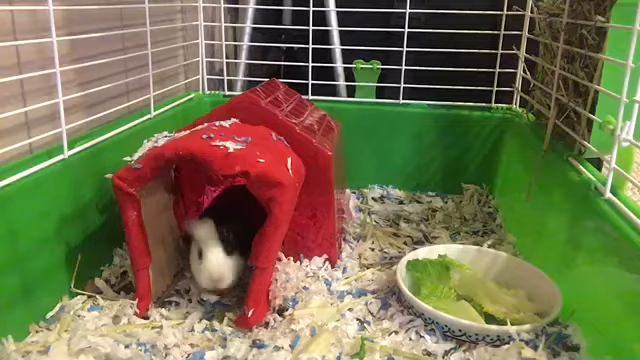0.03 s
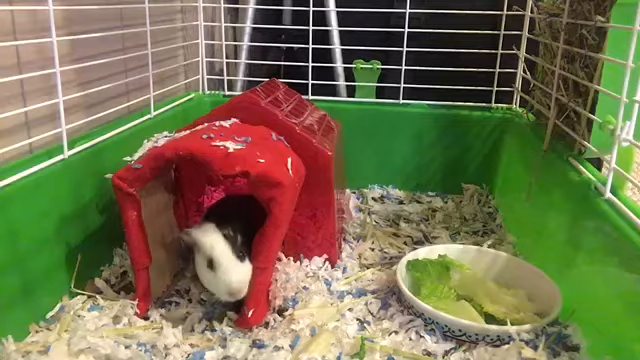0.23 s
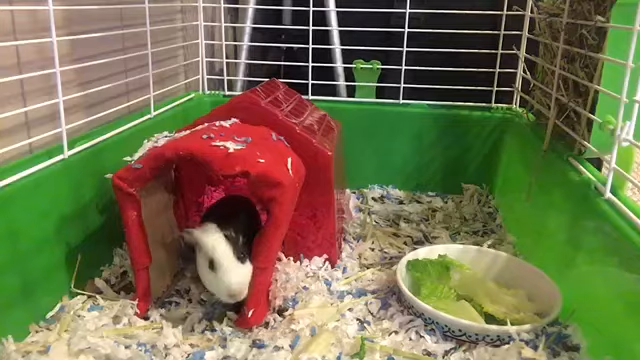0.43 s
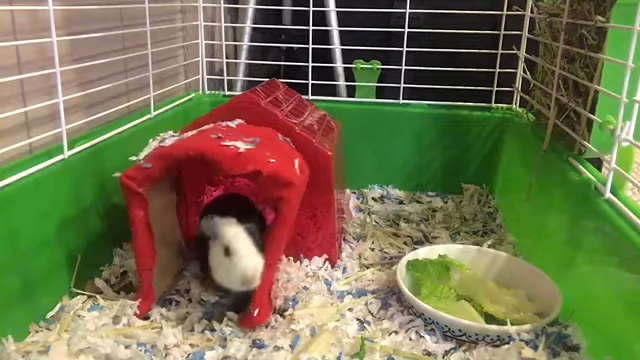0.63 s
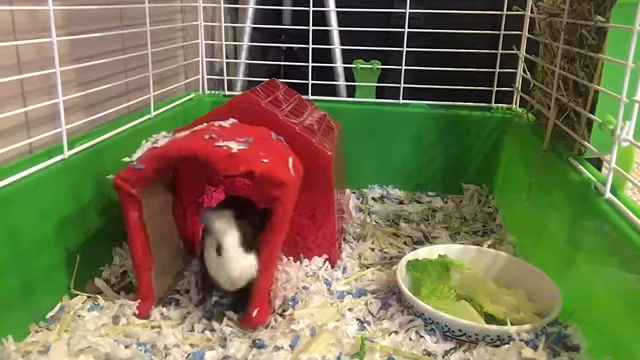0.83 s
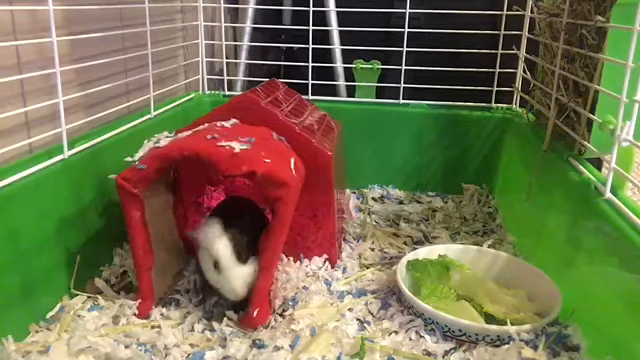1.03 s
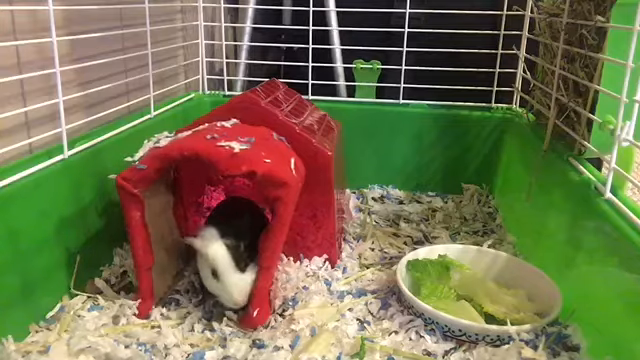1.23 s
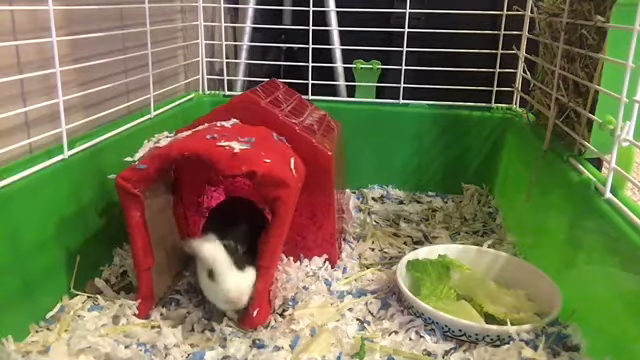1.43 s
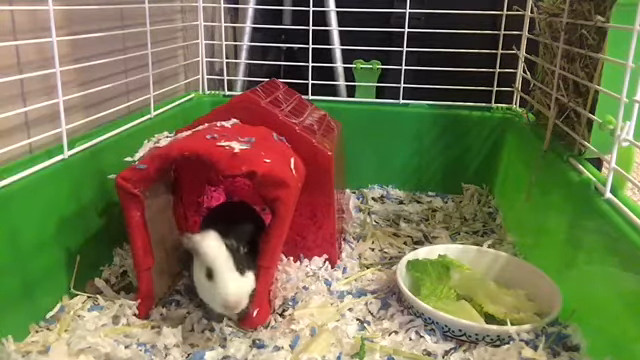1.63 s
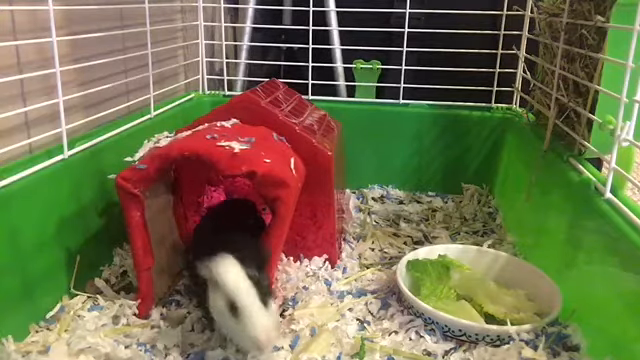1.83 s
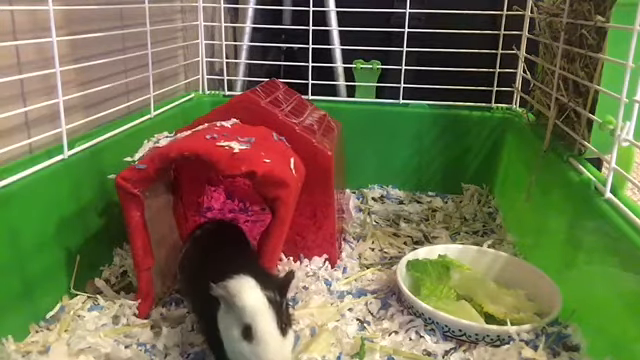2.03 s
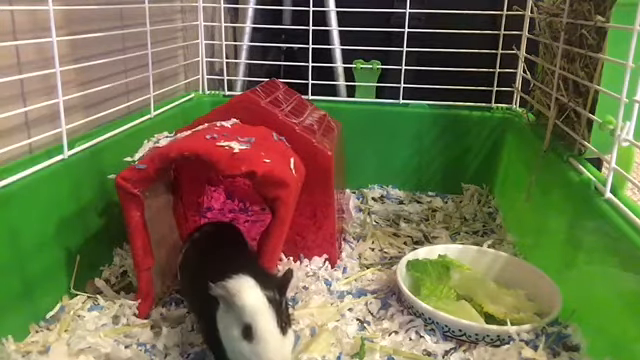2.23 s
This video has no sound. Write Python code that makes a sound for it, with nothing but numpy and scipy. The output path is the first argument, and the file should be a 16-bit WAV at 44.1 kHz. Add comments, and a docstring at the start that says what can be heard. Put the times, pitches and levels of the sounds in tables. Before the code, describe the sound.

Guinea pig's padded footsteps thump and knock on a plastic cage tray through shredded paper

```python
"""The padded steps of a guinea pig leaving its shelter over shredded paper boom and knock a plastic cage tray.
Each step rings damped modes of the tray and crushes paper; shifting weight adds a rumble of shaped noise.
Tapped shelter modes, crackling paper rustles and snaps, and a thin rough squeak lie among the steps.
Behind them are the camera's buzz, fizz and tick from a switched load, and room rumble and microphone hiss
from filtered noise."""
import sys
import numpy as np
from scipy import signal
from scipy.fft import rfft, irfft, next_fast_len
from scipy.io import wavfile
from scipy.ndimage import uniform_filter1d

SR = 44100
rng = np.random.default_rng(int(sys.argv[2]) if len(sys.argv) > 2 else 0)


def log_audio(samples):
    """Write samples as a 16-bit WAV file to the path given in sys.argv[1]."""
    # one column per channel
    frames = np.atleast_2d(samples).T
    # limit to full scale, then quantise
    limited = np.clip(frames, -1, 1)
    pcm = np.round(limited * 32767).astype(np.int16)
    wavfile.write(sys.argv[1], SR, pcm)


N = 100768  # length in samples
EVENT_T = np.arange(SR // 4) / SR  # time within one quarter-second event, in seconds

# Modes of the whole tray: pitch_hz, level_db, t60_s
THUD_MODES = [(56, -8, .16), (74, 0, .22), (88, -5, .16)]
# Modes of the tray floor: pitch_hz, level_db, t60_s
BOOM_MODES = [(122, -5, .18), (141, 1, .22), (174, -9, .15), (205, -11, .12)]
# Modes of the tray walls: pitch_hz, level_db, t60_s
KNOCK_MODES = [(258, 0, .13), (355, -3, .1), (432, 0, .11), (492, -2, .1), (590, -1, .11), (790, -3, .09),
               (1010, -8, .08), (1180, -9, .07)]
# Paw contacts: start_s, thud_level_db, boom_level_db, knock_level_db, favoured_wall_pitch_hz
STEPS = [(0.069, -62, -45.5, -51.5, 290), (.103, -73, -45, -53.5, 493), (0.121, -42.5, -59, -53, 262),
         (.155, -46, -54, -51, 260), (.205, -46.5, -55, -53, 328), (0.249, -43, -51.5, -53, 444),
         (0.271, -45.5, -59, -70, 490), (.385, -57, -45.5, -49, 191), (.571, -45, -50, -54, 318),
         (.596, -36, -55.5, -92, 298), (0.675, -33, -55, -54.5, 527), (.717, -49, -45.5, -56, 332),
         (.759, -69, -45, -41.5, 420), (.783, -31, -41, -40.5, 241), (.808, -63, -47, -57, 540),
         (0.841, -54, -46, -46.5, 313), (.945, -62, -51, -46.5, 306), (.99, -43, -43.5, -46.5, 324),
         (1.031, -54, -51, -48, 270), (1.12, -52, -39, -55.5, 427), (1.157, -79, -49, -50, 272),
         (1.426, -43, -56, -55.5, 630), (1.448, -45, -51, -64, 396), (1.528, -56, -49, -59.5, 448),
         (1.842, -38.5, -52, -82, 300), (1.912, -39, -59, -41.5, 217), (1.925, -37, -25, -50, 227),
         (1.95, -41, -37, -52, 330), (2.002, -59, -60, -47, 610), (2.009, -51, -36.5, -45.5, 250),
         (2.026, -58, -43, -48, 465), (2.062, -61, -46.5, -58, 342), (2.09, -49, -63, -74, 250),
         (2.138, -49, -48.5, -86, 248)]
STEP_ATTACK_S = .005
PADDING = 1.35  # bedding cutoff as a multiple of the favoured pitch
FOCUS_DB_PER_OCT = 15  # loss of a wall mode with distance from the favoured pitch
WALL_SAG = 0.082  # the walls start sharp by this fraction, then sag as the paw's weight settles
SCUFF_DB, SCUFF_T60_S, SCUFF_OCTAVES = -8.5, 0.067, 0.52  # crushed paper, relative to the wall ring


def steps():
    """Modal excitation: each paw rings the tray and crushes paper; the contact point weights the wall modes."""
    out = np.zeros(N)
    press = amp(SCUFF_DB - 60 * EVENT_T / SCUFF_T60_S) * (1 - np.exp(-EVENT_T / STEP_ATTACK_S))
    for start, thud_db, boom_db, knock_db, contact_hz in STEPS:
        walls = []
        for hz, db, t60 in KNOCK_MODES:
            distance_octaves = abs(np.log2(hz / contact_hz))
            walls.append((hz, db - FOCUS_DB_PER_OCT * distance_octaves, t60))
        scuff = press * crackle(band(contact_hz, SCUFF_OCTAVES))
        knock = ring(walls, STEP_ATTACK_S, WALL_SAG) + scuff
        # the bedding acts as a low-pass on the knock and scuff
        bedding = signal.butter(N=3, Wn=PADDING * contact_hz, fs=SR, output="sos")
        padded_knock = signal.sosfilt(bedding, knock)
        thud = ring(THUD_MODES, STEP_ATTACK_S)
        boom = ring(BOOM_MODES, STEP_ATTACK_S)
        add(out, start, amp(thud_db) * thud + amp(boom_db) * boom + amp(knock_db) * padded_knock)
    return out


# Level of the tray's rumble over time: time_s, level_db
SHIFTING_LEVEL = [(0, -58.5), (.07, -58), (.13, -46), (.27, -50), (.33, -58.5), (.53, -58), (.62, -49.5),
                  (.76, -35), (.9, -46), (1.02, -49), (1.17, -51), (1.24, -53.5), (1.38, -58.5),
                  (1.46, -52), (1.66, -58), (1.8, -49), (1.88, -47.5), (2.04, -42), (2.28, -70.5)]
# Spectrum of the tray's rumble: pitch_hz, level_db
RUMBLE_SPECTRUM = [(15, -9), (28, 6), (48, 0.5), (62, 4.5), (75, 9), (88, 1), (105, -4.5), (137, -1),
                   (175, -12), (220, -12), (256, -18.5), (315, -20.5), (470, -30.5), (700, -39.5),
                   (1500, -47.5), (4000, -66)]


def shifting():
    """Continuous random excitation: the animal's moving weight keeps the tray rumbling between steps."""
    return amp(curve(SHIFTING_LEVEL)) * noise(RUMBLE_SPECTRUM)


# Light taps on the shelter: start_s, low_mode_level_db, high_mode_level_db
TAPS = [(.017, -56.5, -73), (.205, -58, -81), (0.923, -54.5, -50.5), (.938, -58.5, -64), (1.747, -73, -57),
        (1.929, -77, -55.5)]
# Lower shelter mode: pitch_hz, level_db, t60_s
TAP_LOW_MODE = [(824, 0, 0.061)]
# Upper shelter mode: pitch_hz, level_db, t60_s
TAP_HIGH_MODE = [(1082, 0, 0.031)]


def taps():
    """Impulsive excitation of two damped modes: small hollow taps on the shelter."""
    out = np.zeros(N)
    for start, low_db, high_db in TAPS:
        low = amp(low_db) * ring(TAP_LOW_MODE, attack_s=.0012)
        high = amp(high_db) * ring(TAP_HIGH_MODE, attack_s=.0015)
        add(out, start, low + high)
    return out


# Paper rustles: start_s, length_s, level_db, centre_hz, half_width_octaves
RUSTLES = [(.138, 0.06, -69, 2500, 0.34), (0.142, 0.038, -73.5, 4800, 1), (0.193, 0.054, -73, 1400, 1),
           (0.558, 0.038, -74.5, 1430, 1), (0.656, 0.053, -74, 1510, 1), (0.738, 0.026, -66, 1720, 1),
           (0.753, 0.037, -64.5, 810, 0.27), (1.105, 0.014, -71, 950, 0.23),
           (1.415, .17, -69.5, 1080, 0.93), (1.457, 0.049, -79, 1980, 0.57),
           (1.998, 0.056, -68, 1000, 0.68), (2.226, 0.053, -70, 2020, 0.54)]
# Single paper strips snapping free: start_s, level_db, pitch_hz
SNAPS = [(0.145, -57, 2650), (0.154, -67, 2800), (.165, -58, 2670), (.178, -64, 2360), (0.23, -60, 1190),
         (0.58, -66, 1700), (.669, -60, 1750), (.746, -62, 2700), (1.292, -57, 1690), (1.418, -60, 2100),
         (1.477, -66, 1380), (1.488, -64, 2210), (1.531, -62, 960), (1.561, -64.5, 1900)]
RUSTLE_RISE = .4  # fraction of a rustle spent rising
SNAP_T60_S, SNAP_GRIT_DB, SNAP_OCTAVES = .02, -8, .5  # grit level is relative to the snap


def rustles():
    """Friction and sudden release: paper strips brush past each other in swells, and single strips snap free."""
    out = np.zeros(N)
    for start, length, db, hz, width in RUSTLES:
        swell = np.interp(EVENT_T / length, [0, RUSTLE_RISE, 1], [0, 1, 0]) ** .5
        add(out, start, amp(db) * swell * crackle(band(hz, width)))
    for start, db, hz in SNAPS:
        grit_decay = amp(SNAP_GRIT_DB - 60 * EVENT_T / SNAP_T60_S)
        grit = grit_decay * crackle(band(hz, SNAP_OCTAVES))
        tone = ring([(hz, 0, SNAP_T60_S)], attack_s=0.0013)
        add(out, start, amp(db) * (tone + grit))
    return out


SQUEAK_S, SQUEAK_LENGTH_S, SQUEAK_HZ, SQUEAK_DB = 1.205, .125, 2630, -79
SQUEAK_SAG, SQUEAK_SETTLE_S = .05, .025  # initial sharpness as a fraction, and its time constant


def squeak():
    """Frequency modulation: a thin tone, roughened by random pitch jitter, sags onto its pitch."""
    out = np.zeros(N)
    sag = SQUEAK_SAG * np.exp(-EVENT_T / SQUEAK_SETTLE_S)
    jitter = 0.2 * rng.standard_normal(len(EVENT_T))
    hz = SQUEAK_HZ * (1 + sag + jitter)
    swell = np.abs(np.sin(np.pi * np.clip(EVENT_T / SQUEAK_LENGTH_S, 0, 1))) ** .5
    tone = np.sin(2 * np.pi * np.cumsum(hz) / SR)
    add(out, SQUEAK_S, amp(SQUEAK_DB) * swell * tone)
    return out


# Spectrum of the switching clicks: pitch_hz, level_db
EDGE_SPECTRUM = [(150, -23), (500, 5.5), (900, 3), (1700, -4), (2500, -1), (3200, -11.5), (5000, -17),
                 (7000, -12.5), (15000, -14)]
# Partials of the tick: pitch_hz, level_db, t60_s
TICK_PARTIALS = [(1360, 0.5, 0.0021), (1950, -6, 0.0035), (4100, -6, 0.0031), (7160, -2.5, 0.003),
                 (11530, 1, 0.0025), (14500, -22, 0.0019)]
# Spectrum of the load's fizz: pitch_hz, level_db
FIZZ_SPECTRUM = [(9000, -60), (12500, -17), (13500, -6), (14350, 0), (15000, -4), (15700, -10)]
BUZZ_HZ, OFF_S, GAP_S = 60, .0109, .0047  # switching rate, a switch-off time, time spent off per cycle
TICK_HZ, TICK_S = 20, .0166  # a tick every third cycle, and the time of one tick
EDGE_DB, TICK_DB, FIZZ_DB = -77.5, -57, -75
FIZZ_OFF_DB = -6.5  # fizz with the load off relative to on, split evenly about FIZZ_DB


def electronics():
    """Periodic switching transients: a load clicks at both edges and fizzes more while on; an even tick recurs."""
    t = np.arange(N) / SR
    on = ((t - OFF_S) % (1 / BUZZ_HZ) > GAP_S) * 1.
    edges = unit(coloured(np.diff(on, prepend=on[0]), EDGE_SPECTRUM))
    age = (t - TICK_S) % (1 / TICK_HZ)
    ticks = np.zeros(N)
    for hz, db, t60 in TICK_PARTIALS:
        ticks += amp(db - 60 * age / t60) * np.sin(2 * np.pi * hz * age)
    fizz = amp(FIZZ_DB + FIZZ_OFF_DB * (0.5 - on)) * noise(FIZZ_SPECTRUM)
    return amp(EDGE_DB) * edges + amp(TICK_DB) * ticks + fizz


# Spectrum of the room rumble: pitch_hz, level_db
ROOM_SPECTRUM = [(20, -7.5), (60, -12.5), (140, -6), (200, -11.5), (320, -24), (600, -28), (1200, -33.5),
                 (2400, -34.5), (3000, -57), (6000, -101)]
# Spectrum of the microphone hiss: pitch_hz, level_db
HISS_SPECTRUM = [(300, 2.5), (2550, -3), (2900, -1.5), (3400, -0.5), (4050, 2.5), (4350, 1), (4700, 5),
                 (5000, 2), (5300, 3), (5900, -0.5), (6400, -6), (7100, 0.5), (8400, -0.5), (9700, 2.5),
                 (10400, -1.5), (11600, -1.5), (15500, -1.5)]
# Level of the hiss over time: time_s, level_db
HISS_LEVEL = [(0, -77), (.69, -77.5), (.74, -73), (1.6, -71.5), (1.77, -74.5), (1.88, -72.5), (2.28, -71.5)]
ROOM_DB = -61.5
PATCH_DB = 3.5  # rms depth of the flicker below 6 kHz


def background():
    """Stationary broadband noise: room rumble, and microphone hiss of slowly varying level."""
    room = amp(ROOM_DB) * patchy(noise(ROOM_SPECTRUM), PATCH_DB)
    hiss = amp(curve(HISS_LEVEL)) * patchy(noise(HISS_SPECTRUM), PATCH_DB)
    return room + hiss


SAG_S = .016  # time constant of a mode's pitch sag


def ring(modes, attack_s, sag=0):
    """Modal synthesis: damped modes after a soft blow, each slightly reweighted and detuned by its contact."""
    spread_db, detune = 1.2, .008
    # warped time makes every mode start sharp by the fraction sag
    bent = EVENT_T + sag * SAG_S * (1 - np.exp(-EVENT_T / SAG_S))
    body = np.zeros(len(EVENT_T))
    for hz, db, t60 in modes:
        decay = amp(db + spread_db * rng.normal() - 60 * EVENT_T / t60)
        mode_hz = hz * (1 + detune * rng.normal())
        body += decay * np.sin(2 * np.pi * mode_hz * bent)
    return body * (1 - np.exp(-EVENT_T / attack_s))


GRAINS_PER_S, GRAIN_SPREAD_DB = 1500, 2.5


def crackle(points):
    """Random impulse train: a quarter second of tiny paper contacts of uneven size, rms 1."""
    n = len(EVENT_T)
    hits = rng.random(n) < GRAINS_PER_S / SR
    sizes = rng.standard_normal(n) * amp(GRAIN_SPREAD_DB * rng.standard_normal(n))
    return unit(coloured(hits * sizes, points))


def band(hz, width):
    """Band-pass response: (Hz, dB) points around hz, falling 3.5 dB at width octaves to either side."""
    octaves = np.linspace(-6, 6, 49)
    gain_db = -20 * np.log10(1 + (octaves / width) ** 4 / 2)
    return np.column_stack([hz * 2 ** octaves, gain_db])


def patchy(x, depth_db):
    """Time-frequency modulation: narrow bands of a noise flicker with only local correlation, at rms 1."""
    z = signal.stft(x, nperseg=1024)[2]
    field = uniform_filter1d(rng.standard_normal(z.shape), size=4, axis=0)  # across frequency
    field = uniform_filter1d(field, size=5, axis=1)  # across time
    # the flicker is shallower in the high treble
    calm = np.interp(np.linspace(0, SR / 2, len(z)), [6000, 10000], [1, .3])[:, None]
    flickering = z * amp(depth_db * calm * unit(field))
    return unit(signal.istft(flickering, nperseg=1024)[1][:N])


def noise(points):
    """Spectral shaping: coloured noise of rms 1."""
    return unit(coloured(rng.standard_normal(N), points))


def coloured(x, points):
    """Minimum-phase filtering: a causal filter with the gain of (Hz, dB) points."""
    m = 2 * next_fast_len(len(x) // 2 + 2048, real=True)
    hz, db = np.transpose(points)
    gain_db = np.interp(np.log(np.fft.rfftfreq(m, 1 / SR) + 1), np.log(hz), db)
    cepstrum = irfft(np.log(amp(gain_db)), m)
    # folding the cepstrum onto positive time makes the filter causal
    cepstrum[1:m // 2] *= 2
    cepstrum[m // 2 + 1:] = 0
    return irfft(rfft(x, m) * np.exp(rfft(cepstrum)), m)[:len(x)]


def curve(rows):
    """Linear interpolation: (s, value) points to one value per sample."""
    return np.interp(np.arange(N) / SR, *np.transpose(rows))


def amp(db):
    """Logarithmic level: decibels to amplitude gain."""
    return 10 ** (np.asarray(db) / 20)


def unit(x):
    """Power normalisation: scale to rms 1."""
    return x / np.sqrt(np.mean(x ** 2) + 1e-30)


def add(out, start, x):
    """Superposition: mix x into out from start in seconds."""
    i = max(0, round(start * SR))
    out[i:i + len(x)] += x[:len(out[i:])]


def scene():
    """Superposition: all sources sum at one microphone."""
    animal = steps() + shifting() + taps() + rustles() + squeak()
    return (animal + electronics() + background())[None]


TOP_HZ = 15750


def record(dry):
    """Band limiting: the camera keeps nothing at or above TOP_HZ."""
    m = next_fast_len(N + 8192)
    passed = np.fft.rfftfreq(m, 1 / SR) < TOP_HZ
    return irfft(rfft(dry, m) * passed, m)[:, :N]


dry = scene()
out = record(dry)
log_audio(out)
```